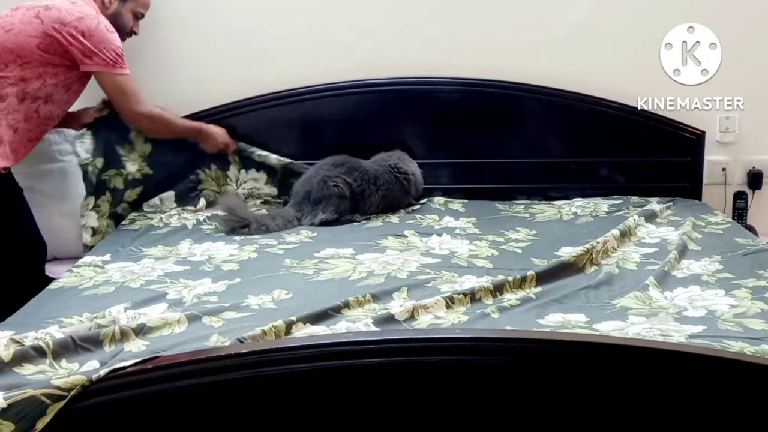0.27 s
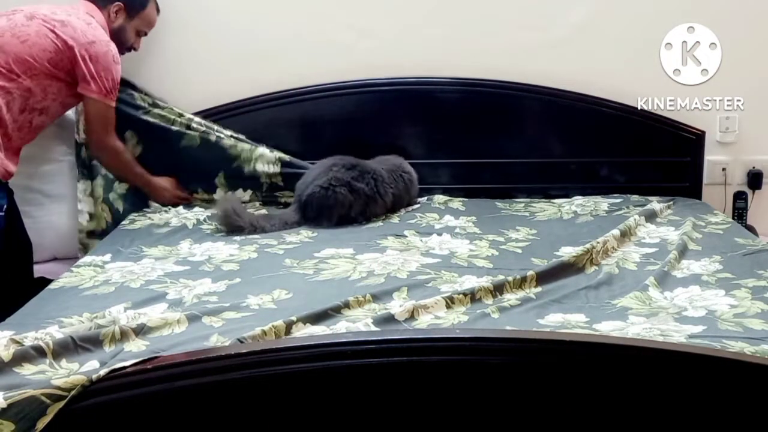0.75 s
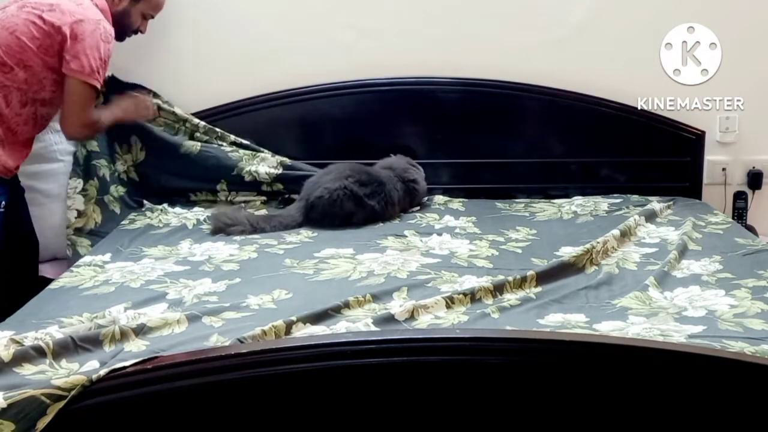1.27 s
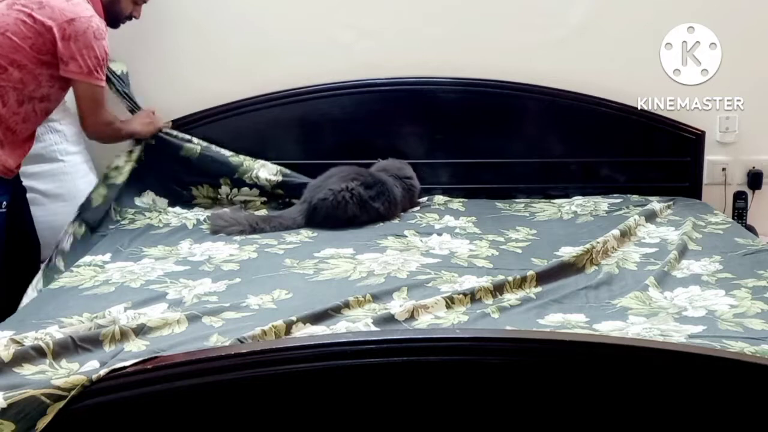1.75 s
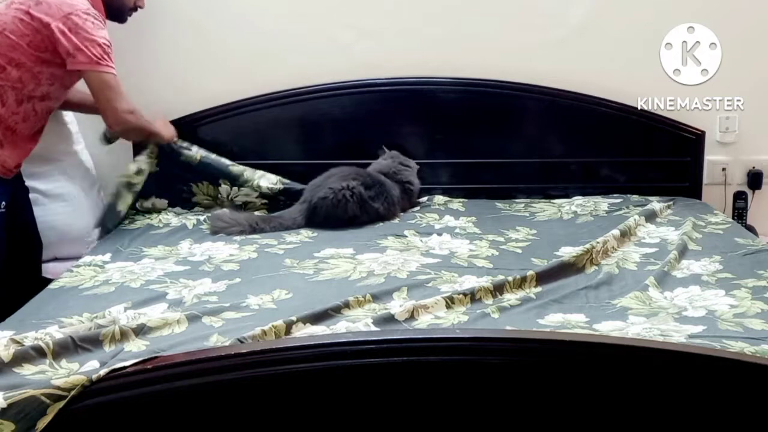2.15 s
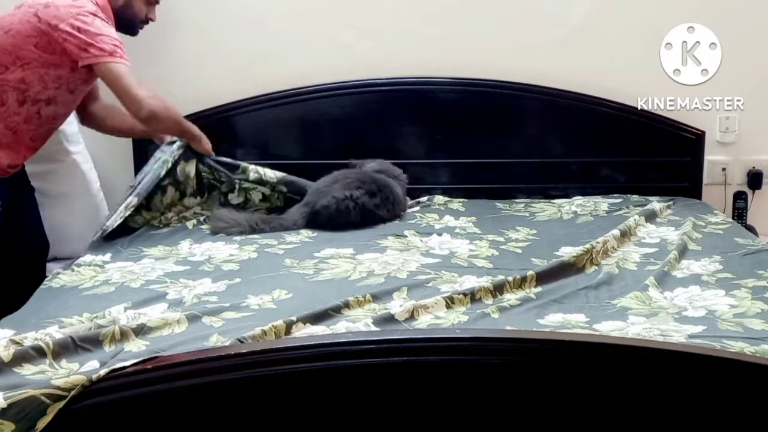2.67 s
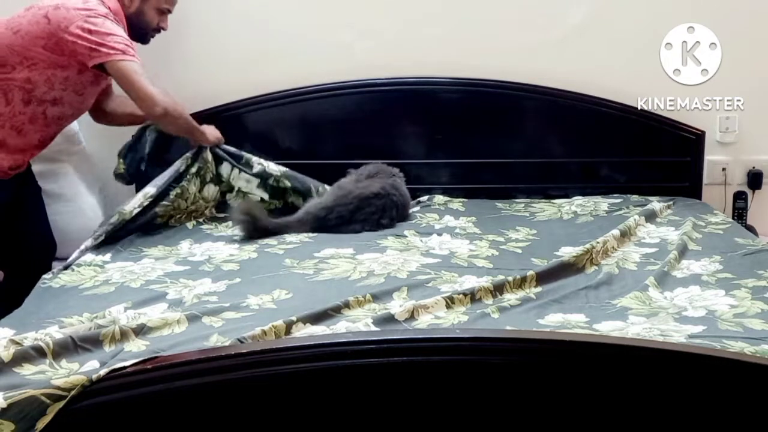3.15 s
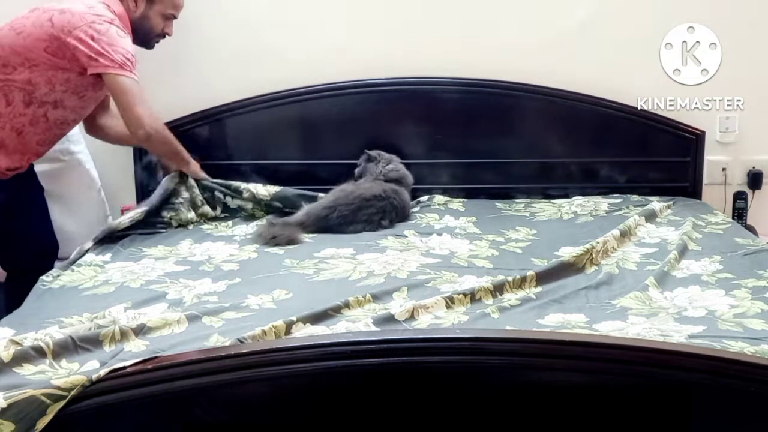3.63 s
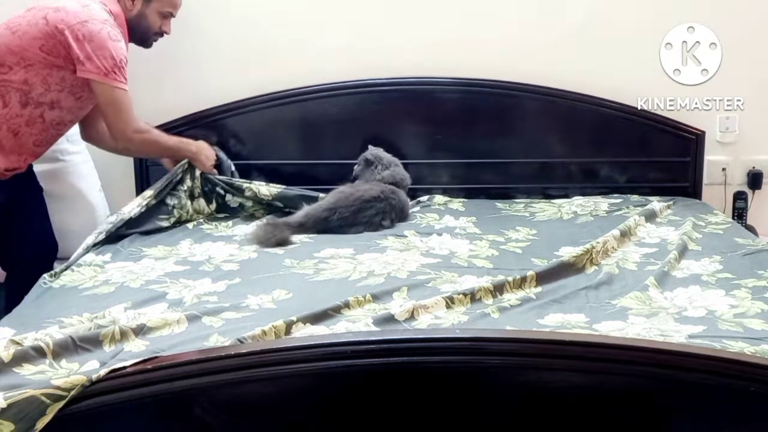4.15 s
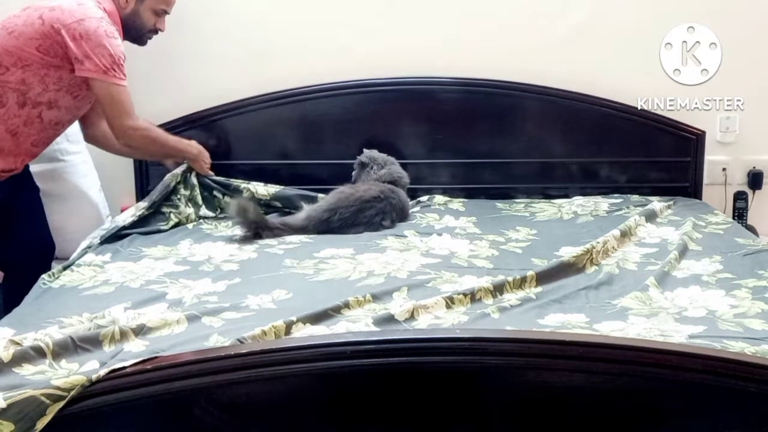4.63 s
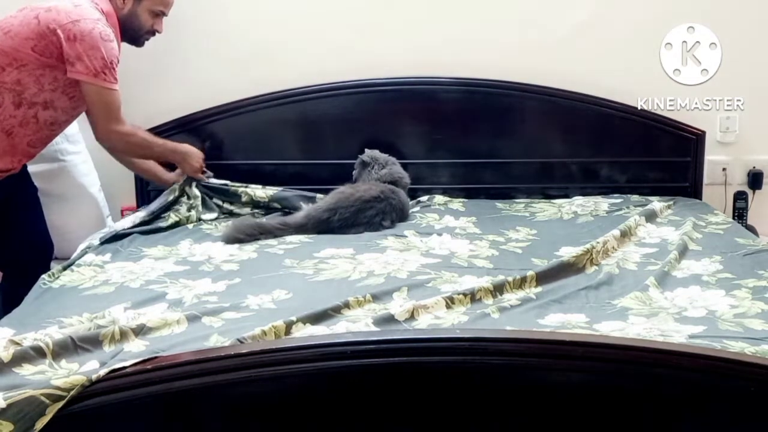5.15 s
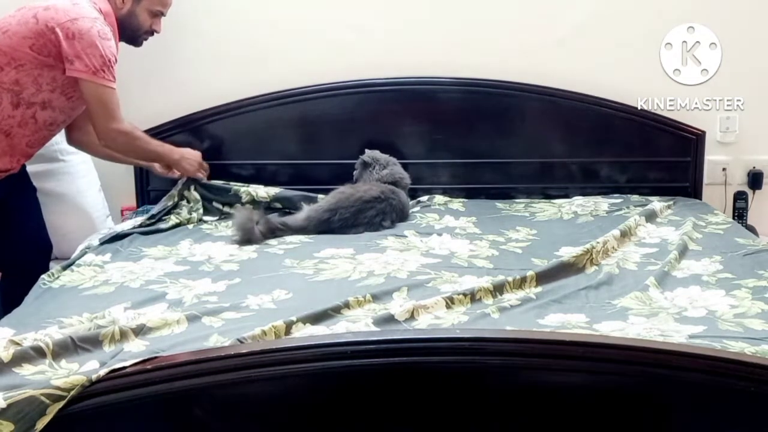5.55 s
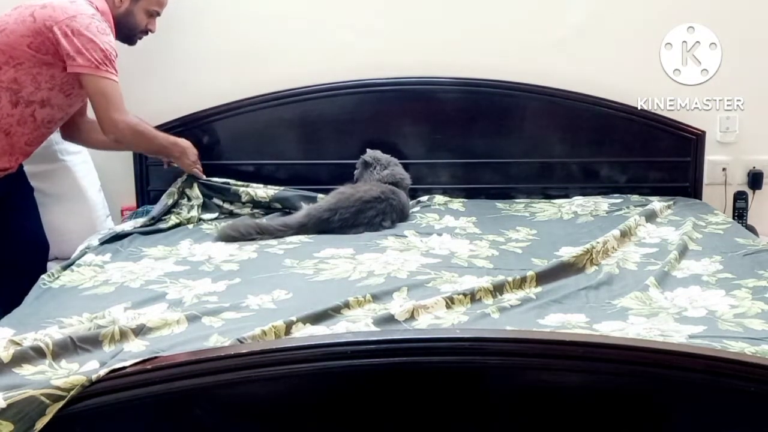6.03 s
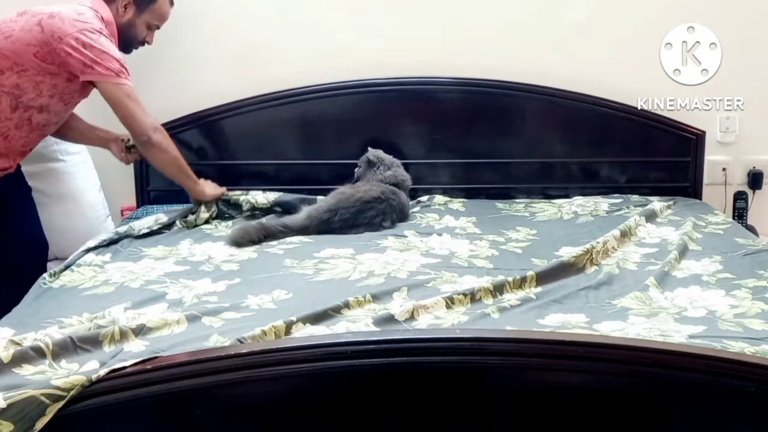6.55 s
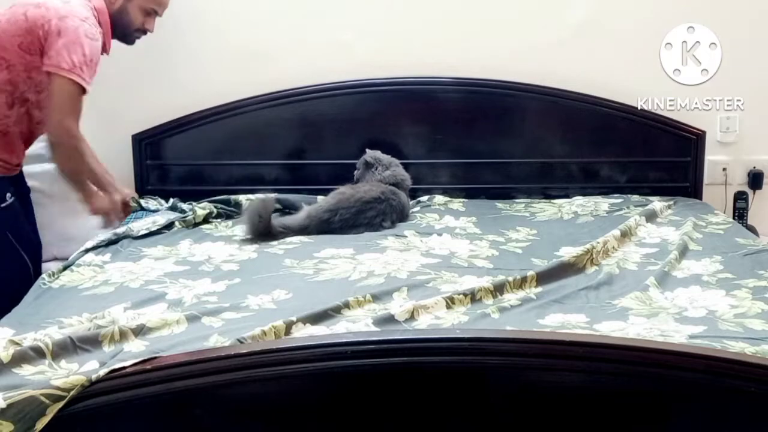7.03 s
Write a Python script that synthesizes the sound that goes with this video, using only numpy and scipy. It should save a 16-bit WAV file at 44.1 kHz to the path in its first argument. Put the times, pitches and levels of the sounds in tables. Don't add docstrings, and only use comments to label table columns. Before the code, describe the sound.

Constant droning fan and compressor hum with airy rumble, light fabric rustles, and two muffled, boomy bed thumps early on.

```python
import sys
import numpy as np
from scipy import signal
from scipy.fft import rfft, irfft
from scipy.io import wavfile
from scipy.ndimage import uniform_filter1d

SR = 44100
rng = np.random.default_rng(int(sys.argv[2]) if len(sys.argv) > 2 else 0)


def decibels_to_gain(level_db):
    exponent = np.asarray(level_db, float) / 20
    return 10 ** exponent


def waveform_to_disk(signal):
    frames = np.transpose(np.atleast_2d(signal))
    scaled = np.clip(frames, -1, 1) * 32767
    samples = np.round(scaled).astype(np.int16)
    wavfile.write(sys.argv[1], SR, samples)


N = 321489
TIMES = np.arange(N) / SR
FREQS = np.fft.rfftfreq(N, 1 / SR)

SHAFT_HZ, PUMP_HZ = 21.86, 47.44
# [multiple of SHAFT_HZ, level/dB, left minus right/dB]
FAN_TONES = [(2, -70, 0), (3, -59, 0), (4, -58, 0), (5, -47, 1), (6, -54, 3), (7, -57, -4), (8, -62, 1),
             (9, -56, -1), (10, -56, 0), (11, -51, 0), (12, -57, -2), (13, -53, 1), (14, -61, 2),
             (15, -70, -2), (16, -65, -5), (18, -65, 4), (28, -73, 1), (29, -71, 4), (35, -64, -1),
             (57, -78, 0), (58, -78, 13), (61, -77, -20), (63, -76, -12), (66, -78, -6), (67, -80, -7),
             (69, -78, 7), (72, -79, 9)]
# [multiple of PUMP_HZ, level/dB, left minus right/dB]
PUMP_TONES = [(1, -58, -1), (2, -50, 0), (4, -56, 1), (9, -64, 3), (13, -74, 15), (15, -78, 4)]
# [f/Hz, sounded 3 % lower, level/dB]
MOTOR_HUMS = [(48.15, -69.5), (50.5, -58.5), (85.4, -60.5), (96.6, -63.5), (100.1, -50.5)]
# [f/Hz, level/dB per Hz, left minus right/dB, likeness of the two ports/0-1]
AIR_RUMBLE = [(28.4, -93.5, 6.5, 0.9), (39.2, -87, 2.5, .94), (49.4, -73, -1, 0.89), (77.5, -72, -2, 0.98),
              (126.6, -59.5, -0.5, 1), (178, -69.5, -0.5, 0.96), (388, -73.5, 0, 0.79), (696, -85, 1, 0.62),
              (780, -74.5, 2, 0.9), (1130, -84.5, -0.5, 0.37), (1763, -93, -7, 0), (1895, -100, 1.5, 0),
              (2040, -99, -9.5, 0), (2660, -108, 0.5, 0.7)]
# [f/Hz, width/Hz, boost/dB]
ROOM_WAVES = [(88.4, 9.8, 1.5), (137, 23, 0.5), (175.4, 8.3, 4), (74.6, 10, 3.5), (241, 12, 3.5),
              (209, 14, 2), (297.3, 14, 5), (348, 28, -2), (402.5, 23, 4), (347, 6.8, 2), (457.7, 13, 4.5),
              (532, 13, 0.5), (546.5, 16, 3.5), (658, 20, 4), (886, 49, 3), (1248, 110, 3)]
# [f/Hz, left level/dB per Hz, right level/dB per Hz]
PORT_HISS = [(2000, -112, -112), (2400, -110, -111), (3760, -115, -117), (5800, -123, -125),
             (7500, -124, -133), (9500, -123, -128), (11000, -123, -124), (13000, -123, -123),
             (15400, -123, -123)]
# [f/Hz, level/dB]
CLOTH_COLOUR = [(1200, -11), (2200, -1.5), (4500, -11), (5700, -10.5), (6900, -5), (8100, -3), (9400, 0),
                (10500, -4), (12000, -4.5), (13500, -5.5), (15400, -12.5)]
# [f/Hz, level/dB]
RIGHT_PORT_DIP = [(2500, 0), (4500, -4), (5700, -12), (6900, -30), (9000, -30), (10500, -22), (12000, -12),
                  (14000, -8)]
# [peak t/s, swish level/dB, swell/s, share of dull scrape/dB]
SHEET_TUGS = [(.485, -70, .035, -8.5), (.775, -72, 0.036, -3), (.87, -77.5, .04, 3), (1.15, -78.5, .06, -4),
              (1.715, -71.5, 0.06, -9), (2.25, -65.5, .05, -6), (2.32, -72, .04, -6),
              (2.722, -73, 0.046, 0), (2.825, -79, 0.0204, 1), (3.58, -76, .04, -7), (3.79, -80, 0.055, -1),
              (6.525, -64, 0.05, -1), (6.92, -83.5, .02, 3), (6.99, -77, .05, -1)]
# [peak t/s, swish level/dB]
SHEET_SHUFFLES = [(.36, -83), (1.001, -86.5), (1.48, -84), (1.88, -88), (3.08, -88.5), (3.3, -82),
                  (3.67, -84), (4.51, -85.5), (5.09, -84), (5.32, -87), (5.4, -87.5), (5.67, -88),
                  (5.9, -92.5), (6.24, -84.5), (6.38, -86), (6.64, -82.5)]
# [t/s, peak level/dB, top f/Hz, time to fall 60 dB/s]
BED_THUDS = [
    (.783, -40, 484, .45),
    (2.442, -44, 900, 0.26),
    (2.495, -45, 795, 0.17),
]
# [t/s, f/Hz, peak level/dB, time to fall 60 dB/s]
PANEL_BOOMS = [(0.788, 267, -20, 0.067), (.788, 697, -40.5, 0.13), (.794, 100, -24, 0.09),
               (0.802, 359, -25, 0.073), (.809, 460, -37, 0.092), (0.81, 116, -20.5, 0.11),
               (.815, 740, -42.5, .12), (.822, 251, -21.5, 0.12), (.833, 146.5, -23, 0.19),
               (.845, 406, -33, 0.14), (0.901, 259, -35, 0.08), (2.445, 423, -40, 0.14),
               (2.447, 780, -38.5, 0.059), (2.45, 92.3, -28, 0.35), (2.451, 263, -30, 0.12),
               (2.455, 552, -38, 0.24), (2.488, 237, -29.5, 0.13), (2.497, 816, -51, 0.077),
               (2.502, 414, -37.5, 0.1), (2.516, 90.4, -20.5, 0.22), (2.569, 93, -31, 0.23)]
# [t/s, peak level/dB, centre f/Hz, width/octaves, time to fall 60 dB/s]
CREASE_SNAPS = [
    (2.816, -76, 3000, 1.4, .1),
    (2.818, -65, 2200, .8, .1),
    (4.51, -80, 6000, 1, .1),
    (6.52, -68, 3000, 1, .2),
    (6.905, -75, 6000, .4, .5),
    (6.909, -58, 1700, .6, .45),
]


def curve(table, column):
    rows = np.array(table)
    return np.interp(np.log(FREQS + 1), np.log(rows[:, 0]), rows[:, column])


def noise():
    return rfft(rng.standard_normal(N)) * np.sqrt(SR / 2)


def walk(rate):
    steps = np.repeat(rng.standard_normal(int(N / SR * rate) + 2), 16)
    smooth = uniform_filter1d(uniform_filter1d(steps, size=16), size=16)
    return 0.98 * np.interp(TIMES * rate * 16, np.arange(len(steps)), smooth)


def pair(x, pan_db):
    return x * decibels_to_gain(np.array([[pan_db], [-pan_db]]) / 2)


def tones(hz, rows, slip, flutter_db, spread=.78, askew=.15, lag_s=0.00012):
    port_times = TIMES - np.array([[0], [lag_s]])
    angle = 2 * np.pi * hz * port_times + slip * walk(1.518)
    total = np.zeros((2, N))
    for multiple, db, pan_db in rows:
        level = np.sqrt(2) * decibels_to_gain(db + flutter_db * walk(3.053))
        start = spread * multiple ** 2 + 1.8 * rng.random()
        skew = askew * min(multiple * hz / 200, 1) * rng.standard_normal() * np.array([[1], [-1]])
        total += pair(level * np.sin(multiple * angle + start + skew), pan_db)
    return total


def machine():
    fan = tones(SHAFT_HZ, FAN_TONES, slip=.02, flutter_db=2.5)
    compressor = tones(PUMP_HZ, PUMP_TONES, slip=0.05, flutter_db=0.0)
    motors = sum(tones(hz, [(0.97, db, 0.0011)], slip=0.11, flutter_db=2.0) for hz, db in MOTOR_HUMS)
    return fan + compressor + motors


def breathe(spectrum, depth_db, rate):
    octave, flow = np.log2(FREQS + 1), walk(0.5)
    total = 0
    for middle in range(4, 15):
        swell_db = depth_db * (.5 * flow + walk(rate))
        band = spectrum * np.clip(1 - abs(octave - middle), 0, 1)
        if band.any():
            total = total + irfft(band, N) * decibels_to_gain(swell_db)
    return total


def air(lag_s=0.00014):
    likeness = np.clip(curve(AIR_RUMBLE, 3), 0, 1)
    limits = (FREQS > 20) * (FREQS < 8000) / (1 + (FREQS / 3200) ** 6)
    room_db = sum(db / (1 + (2 * (FREQS - hz) / wide) ** 2) for hz, wide, db in ROOM_WAVES)
    gain = decibels_to_gain(curve(AIR_RUMBLE, 1)) * limits * decibels_to_gain(room_db)
    shared = noise() * np.sqrt(likeness)
    delay = np.exp(-2j * np.pi * FREQS * lag_s)
    pan_db = curve(AIR_RUMBLE, 2)
    left = (shared + noise() * np.sqrt(1 - likeness)) * decibels_to_gain(pan_db / 2)
    right = (shared * delay + noise() * np.sqrt(1 - likeness)) * decibels_to_gain(-pan_db / 2)
    return breathe(gain * np.array([left, right]), depth_db=1.0, rate=2.5)


def hiss():
    fade = 1 / (1 + (1800 / (FREQS + 1)) ** 6) * (FREQS < 15450) * (FREQS > 1030)
    ports = np.array([noise() * decibels_to_gain(curve(PORT_HISS, side)) * fade for side in (1, 2)])
    return breathe(ports, depth_db=.8, rate=2.2)


def cloth_noise():
    return np.array([noise(), noise() * decibels_to_gain(curve(RIGHT_PORT_DIP, 1))])


def tugging():
    shuffle_swell_s, shuffle_dull_db = .04, -2
    fade_per_swell = 1.4
    steep_db, roundness = 5.5, 1.6
    crisp_db, crisp_fade_db = -3, 3.5
    slow = TIMES[::64]
    rows = SHEET_TUGS + [(s, db, shuffle_swell_s, shuffle_dull_db) for s, db in SHEET_SHUFFLES]
    peak_s, db, swell_s, dull_db = np.transpose(rows)[:, :, None]
    away = (slow - peak_s) / swell_s
    early = np.clip(-away, 0, None)
    late = np.clip(away, 0, None) / fade_per_swell
    shape_db = db - steep_db * (late + early) ** roundness
    levels = []
    for share_db in (dull_db + 4, 0, crisp_db - crisp_fade_db * late):
        power = np.sum(decibels_to_gain(shape_db + share_db) ** 2, axis=0)
        levels.append(np.interp(TIMES, slow, np.sqrt(power)))
    return levels


def sheet(grain_db=2.0, clump_db=1.0):
    dull = 1 / (1 + (FREQS / 6300) ** 8)
    crisp = 1 / (1 + (11500 / (FREQS + 1)) ** 8)
    bands = (dull, 1 - dull - crisp, crisp)
    threads = cloth_noise() * decibels_to_gain(curve(CLOTH_COLOUR, 1) - 36.0) / (1 + (1200 / (FREQS + 1)) ** 4)
    clumps = clump_db * walk(28)
    swish = np.zeros((2, N))
    for band, level in zip(bands, tugging()):
        swish += irfft(threads * band, N) * level * decibels_to_gain(clumps + grain_db * walk(90))
    return swish


def after(s, t60, rise):
    start, shape = int(s * SR), np.zeros(N)
    t = TIMES[start:start + SR] - start / SR
    shape[start:start + SR] = (1 - np.exp(-t / rise)) * np.exp(-np.log(1000) * t / t60)
    return shape


def bed():
    rise_per_t60 = 0.036
    near = slice(0, int(3.5 * SR))
    booms = np.zeros(N)
    for s, hz, db, t60 in PANEL_BOOMS:
        shape = after(s, t60, rise_per_t60 * t60)[near]
        booms[near] += decibels_to_gain(db + 3.0) * shape * np.sin(2 * np.pi * hz * (TIMES[near] - s))
    padding = noise() * (FREQS > 150)
    thuds = np.zeros(N)
    for s, db, top_hz, t60 in BED_THUDS:
        muffled = irfft(padding / (1 + (FREQS / top_hz) ** 6), N)
        thuds += decibels_to_gain(db - 18) * after(s, t60, .008) * muffled
    return booms + thuds


def room(x, t60=0.66):
    size = SR // 2
    fall = decibels_to_gain(-46) * np.exp(-np.log(1000) * np.arange(size) / SR / t60)
    tail = (rng.standard_normal(size) + .4 * rng.standard_normal((2, size))) * fall
    return x + signal.fftconvolve(x[None], tail, axes=1)[:, :N]


def snaps():
    puff = cloth_noise()
    total = np.zeros((2, N))
    for s, db, hz, octaves, t60 in CREASE_SNAPS:
        band = 1 / (1 + (np.log2((FREQS + 1) / hz) / octaves) ** 4)
        total += irfft(puff * band, N) * decibels_to_gain(db - 34) * after(s, t60, rise=0.0022)
    return total


def scene():
    return machine() + air() + hiss() + sheet() + room(bed()) + snaps()


def top_cut(x):
    return signal.sosfilt(signal.butter(12, 15380, fs=SR, output="sos"), x)


def record(dry):
    opening = np.clip(TIMES / 0.0017, 0, 1)
    return top_cut(dry * opening)


dry = scene()
out = record(dry)
waveform_to_disk(out)
```